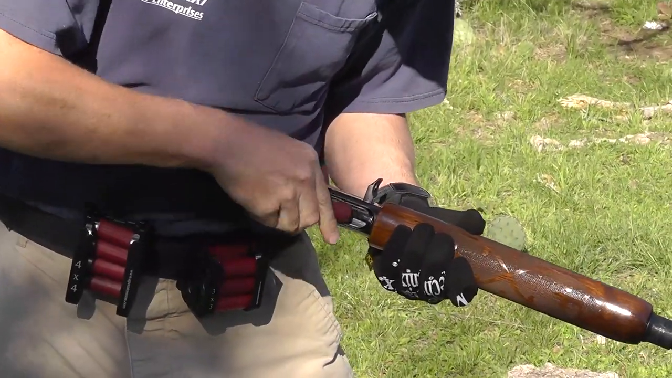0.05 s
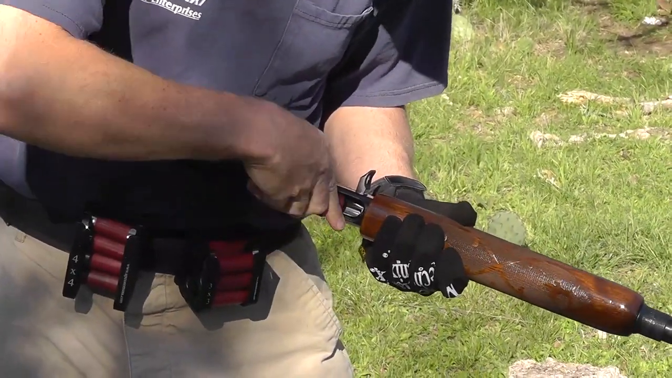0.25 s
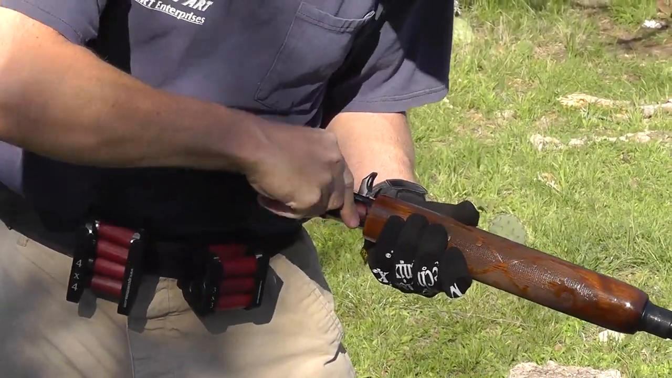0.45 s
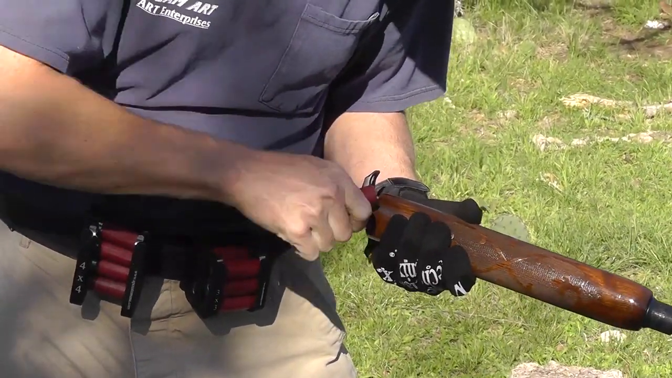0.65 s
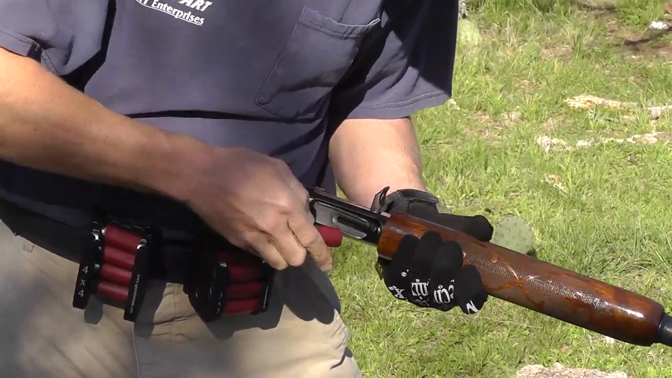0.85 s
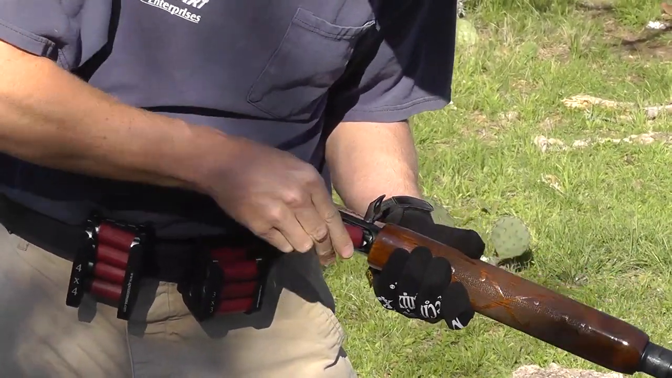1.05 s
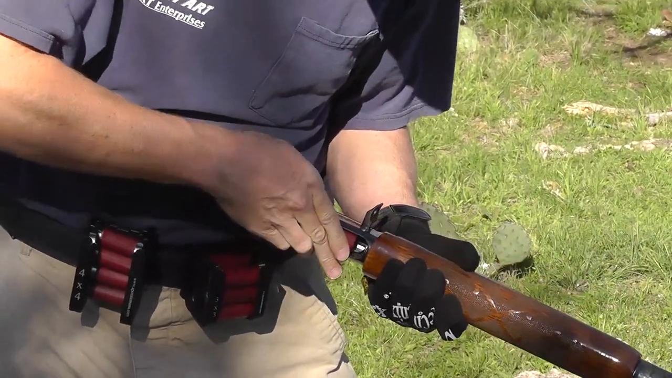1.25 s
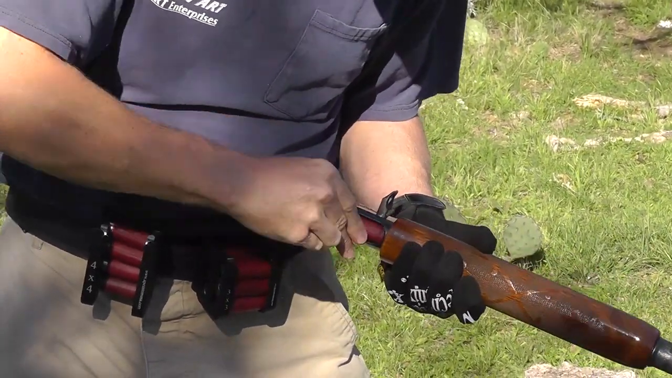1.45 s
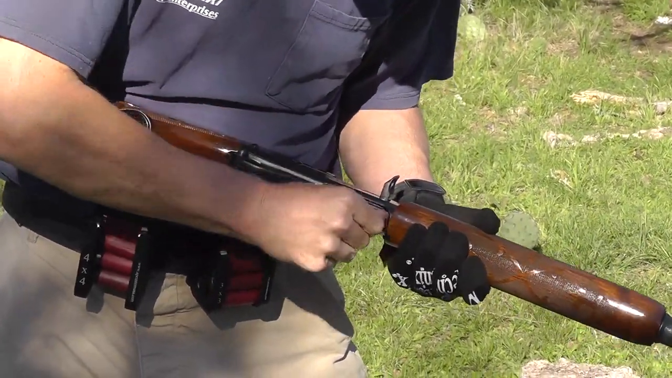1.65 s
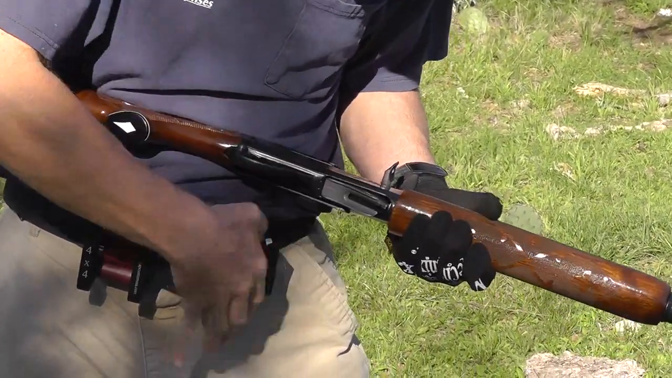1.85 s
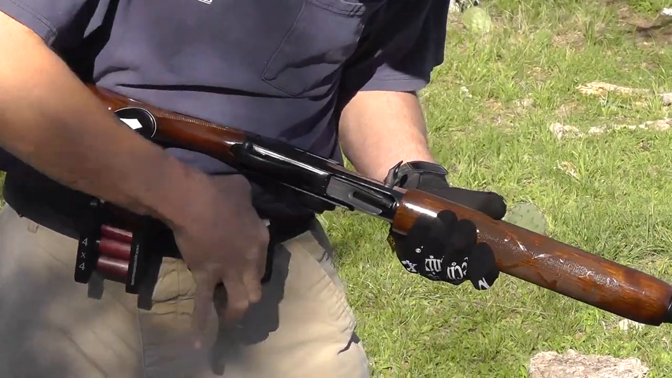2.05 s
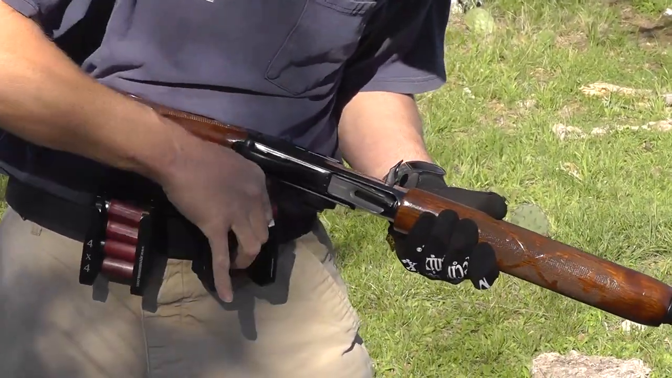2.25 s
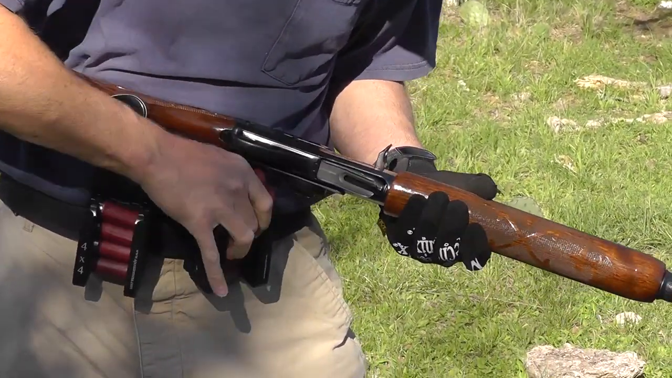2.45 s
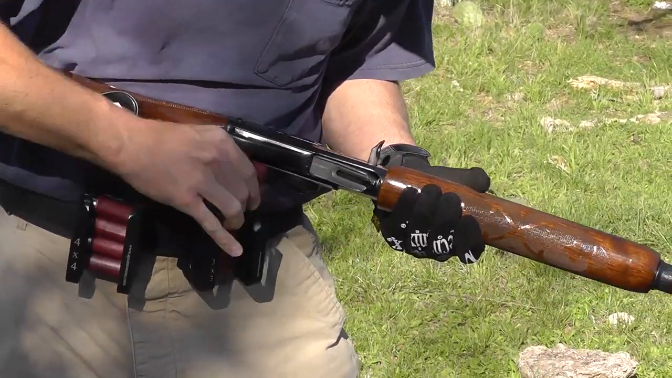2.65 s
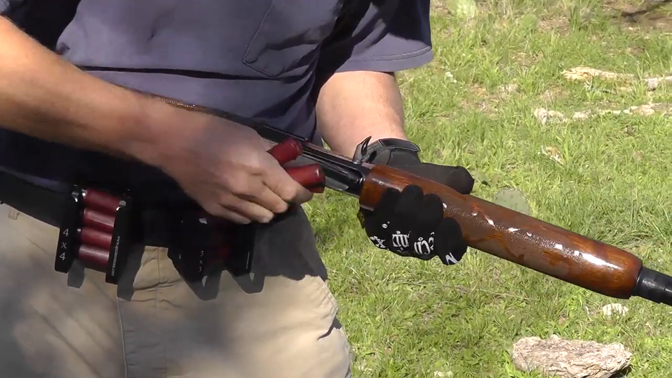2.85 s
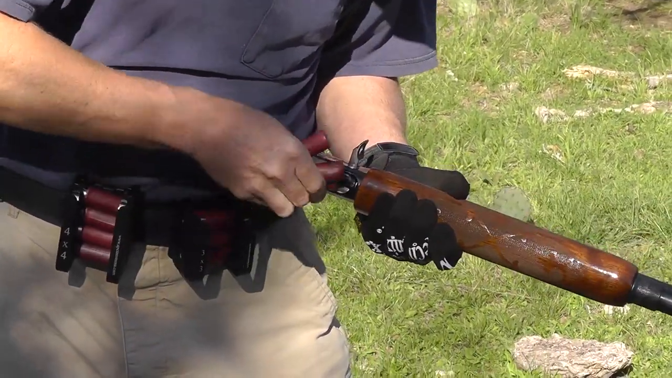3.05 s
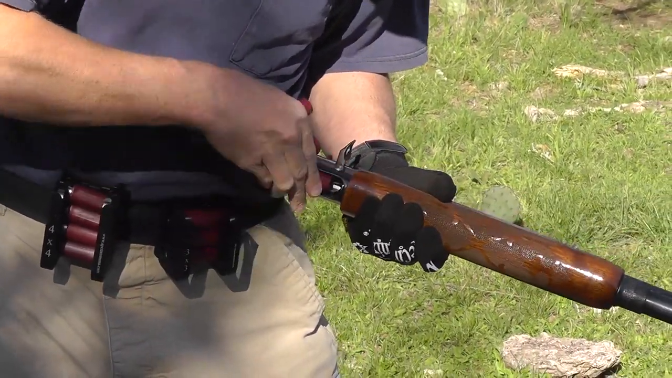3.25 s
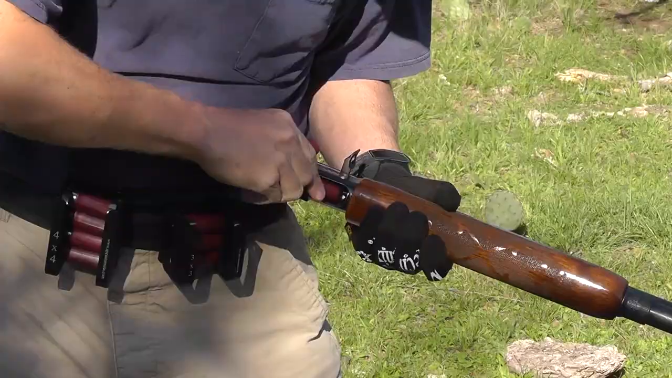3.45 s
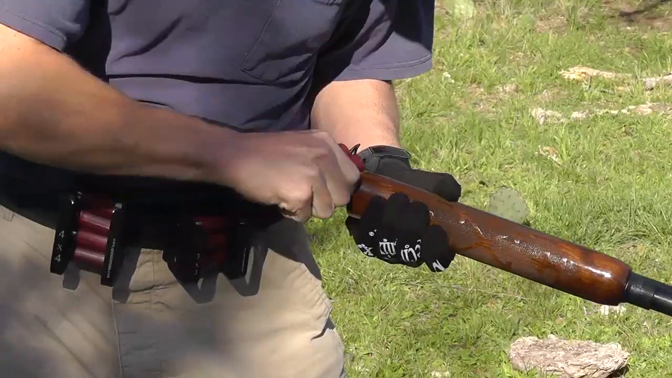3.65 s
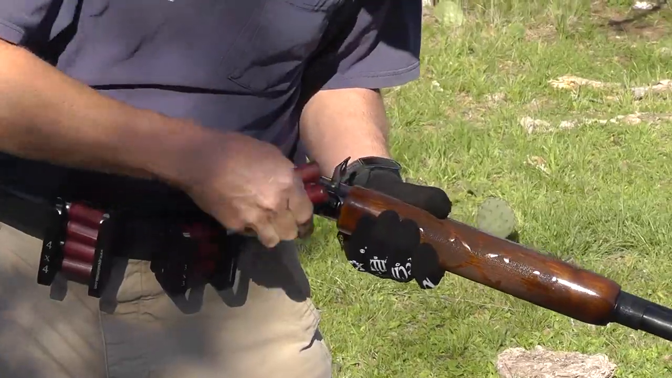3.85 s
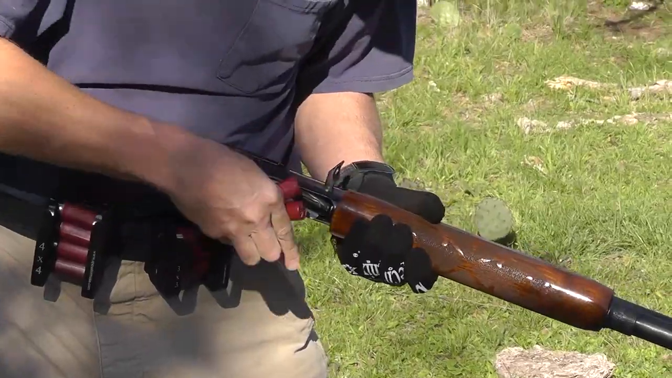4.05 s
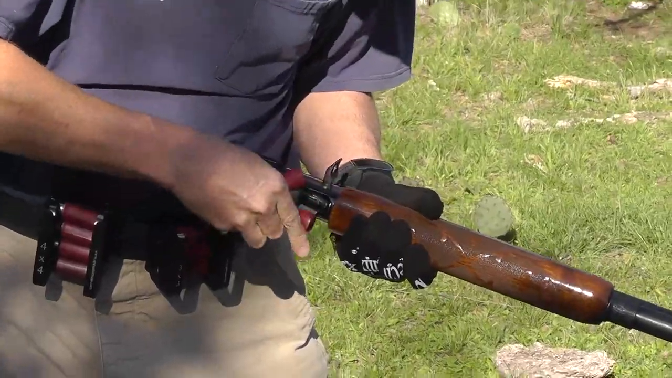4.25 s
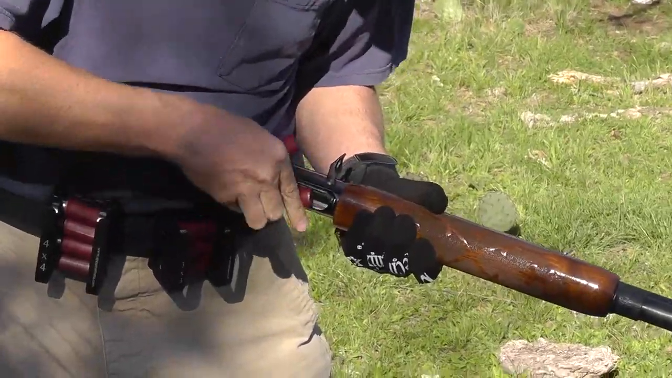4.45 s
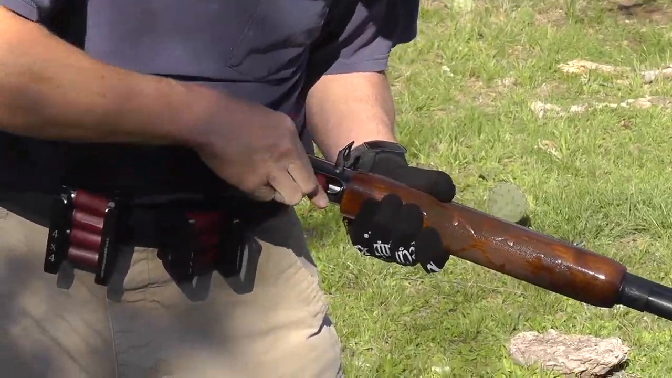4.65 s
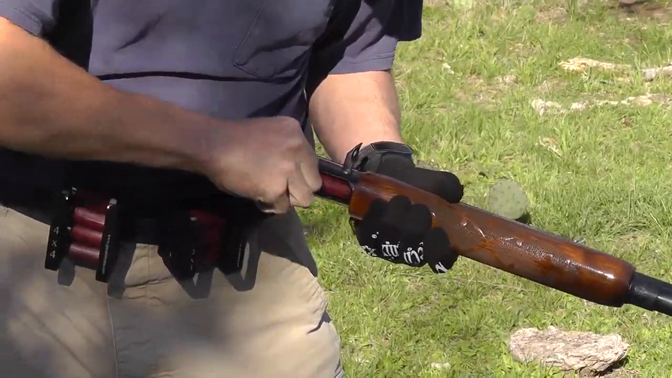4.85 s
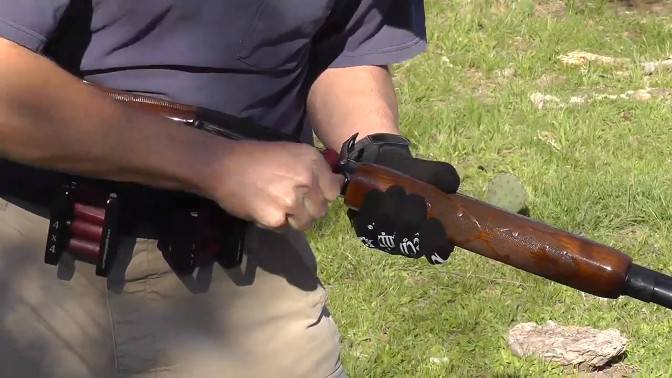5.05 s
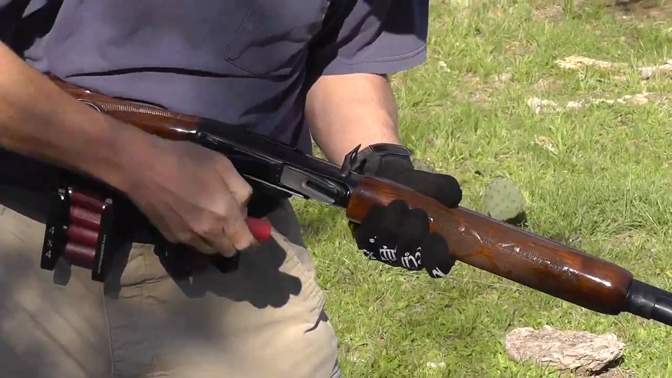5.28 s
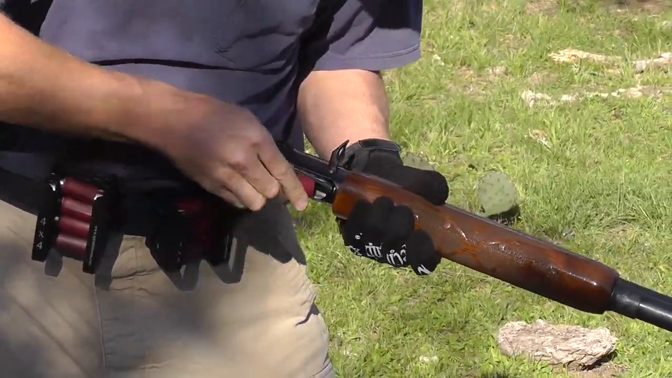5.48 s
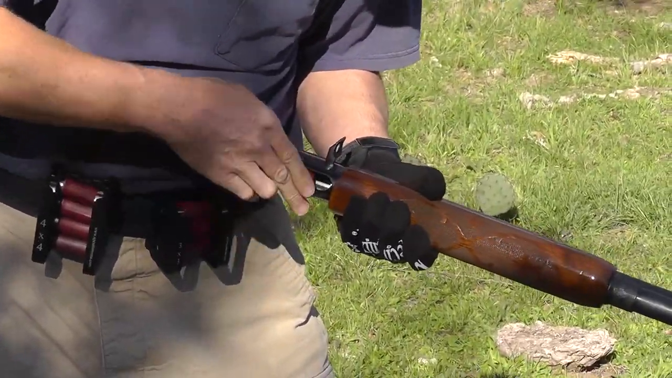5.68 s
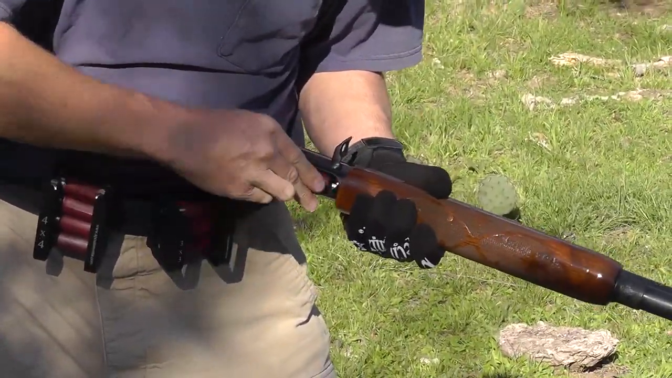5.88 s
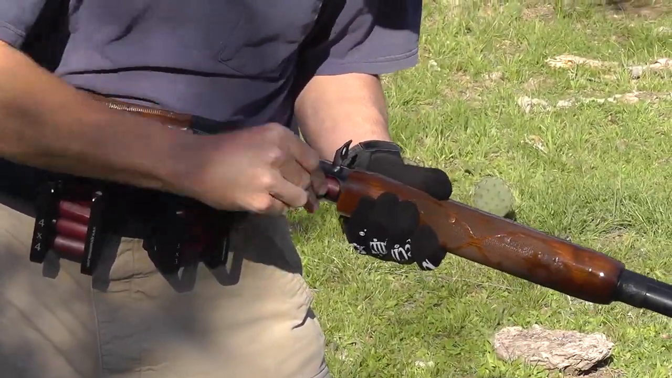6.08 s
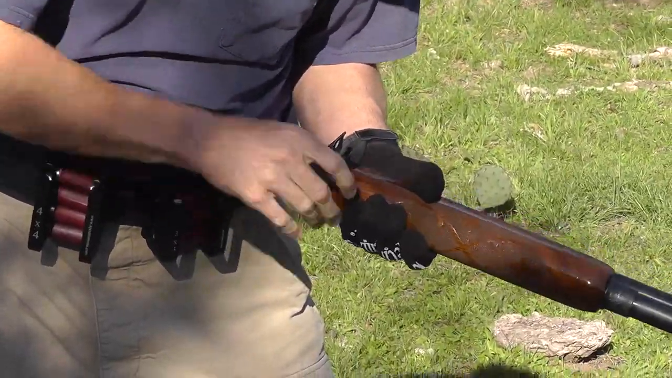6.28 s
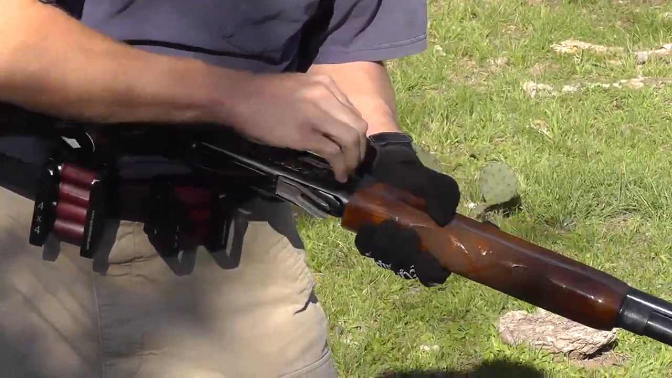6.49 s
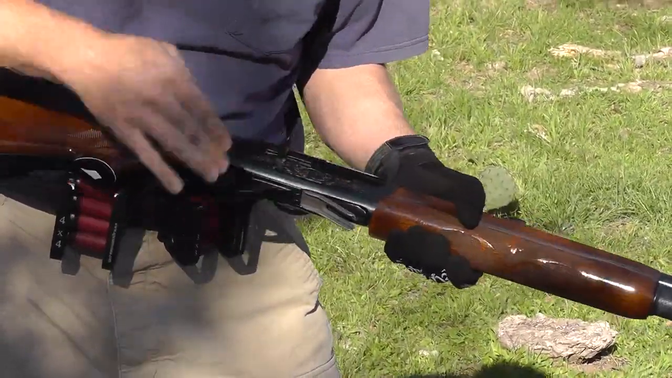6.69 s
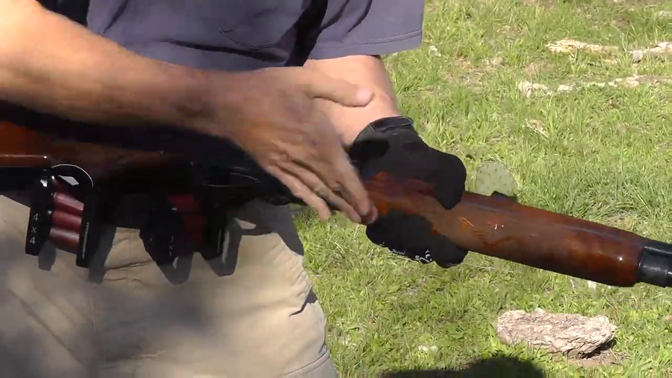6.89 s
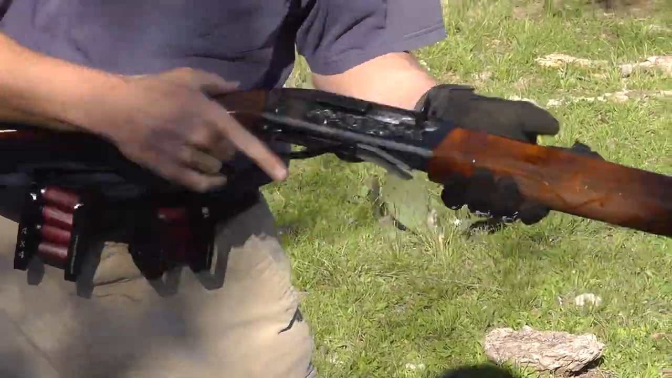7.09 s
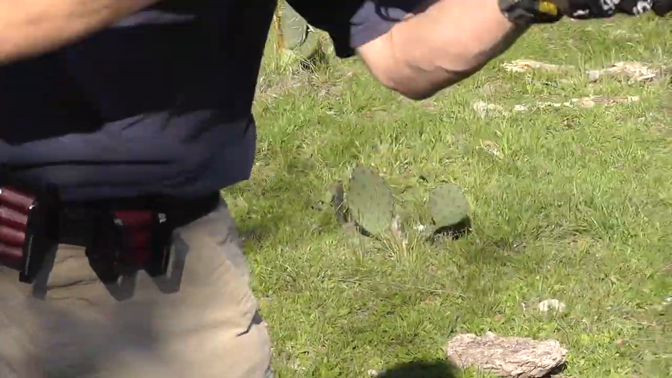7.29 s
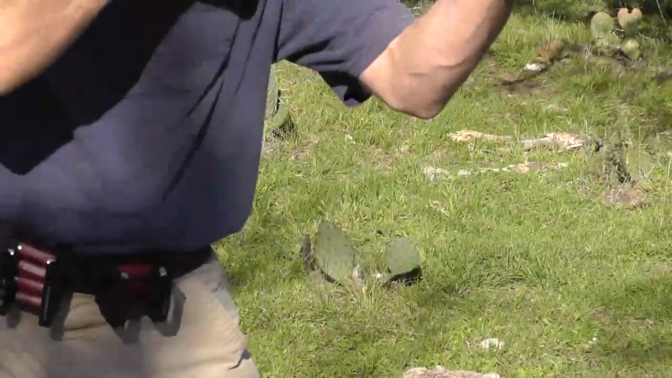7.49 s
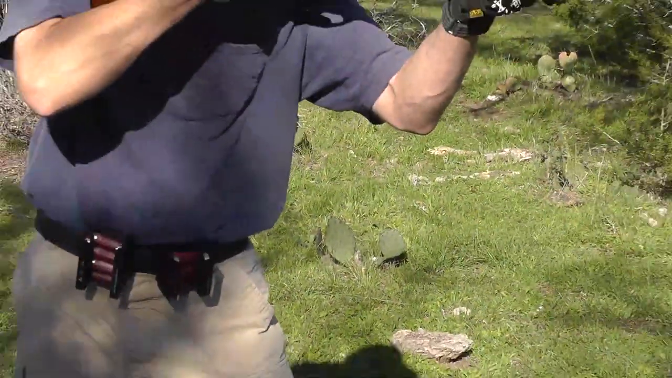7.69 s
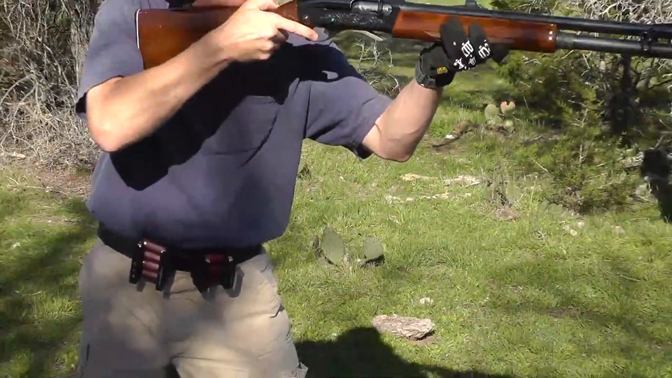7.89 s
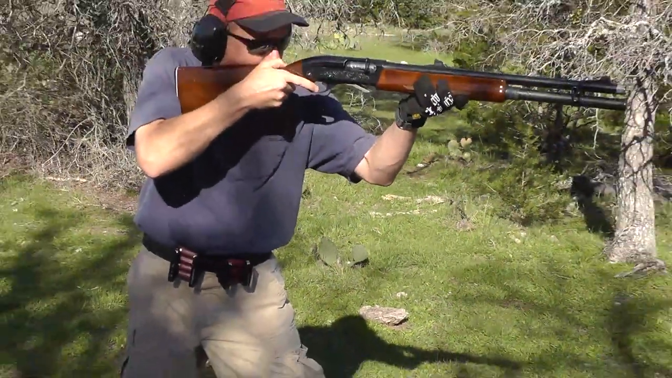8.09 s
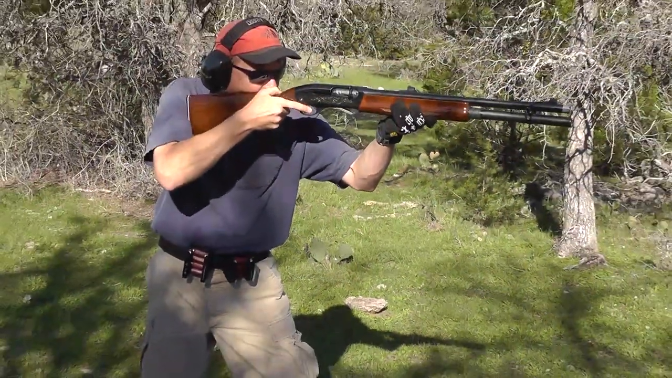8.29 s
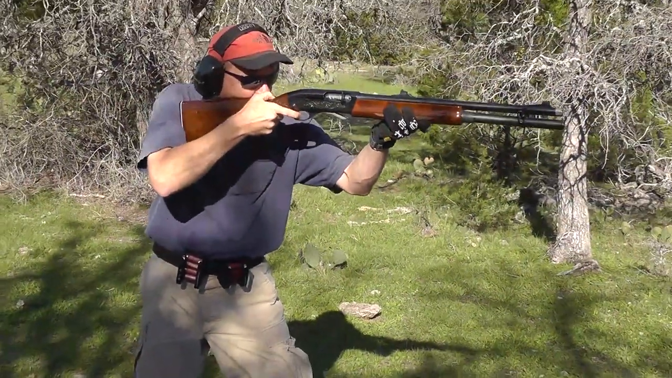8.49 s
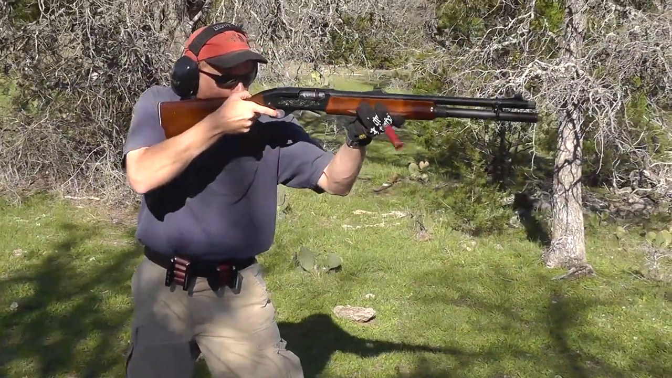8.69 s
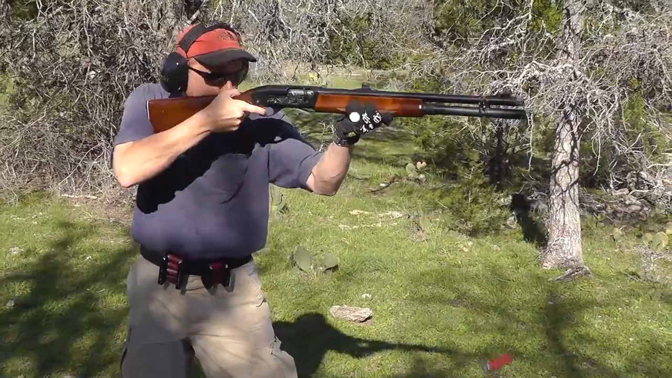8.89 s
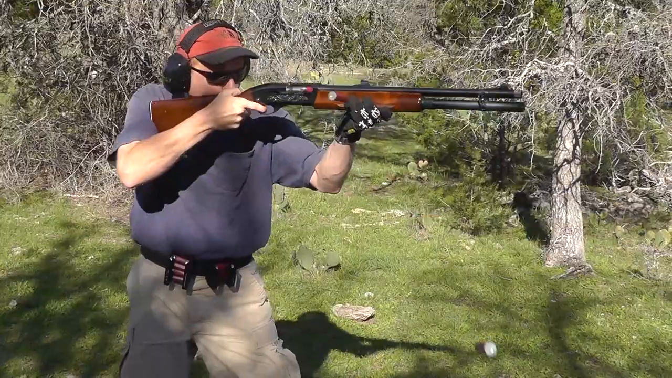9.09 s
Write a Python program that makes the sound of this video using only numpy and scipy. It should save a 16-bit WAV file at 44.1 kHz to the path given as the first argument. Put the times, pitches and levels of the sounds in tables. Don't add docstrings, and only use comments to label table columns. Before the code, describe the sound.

Shells click and pop into a shotgun in gusty wind, the bolt slams, then three fast gunshots crack and roar off the trees.

```python
import sys
import numpy as np
from scipy import signal
from scipy.fft import rfft, irfft, next_fast_len
from scipy.io import wavfile
from scipy.ndimage import uniform_filter1d

SR = 44100
rng = np.random.default_rng(int(sys.argv[2]) if len(sys.argv) > 2 else 0)


def level_to_linear(level):
    exponent = np.asarray(level, float) / 20
    return 10 ** exponent


def to_wav(sig):
    pcm = np.clip(np.atleast_2d(sig), -1, 1) * 32767
    pcm = np.round(pcm).astype(np.int16)
    wavfile.write(sys.argv[1], SR, pcm.T)


N = 402633
TIME = np.arange(N) / SR


def evened(x):
    return x / np.sqrt(np.mean(x ** 2) + 1e-20)


def topped(x, db):
    return level_to_linear(db) * x / np.sqrt(uniform_filter1d(x ** 2, 180).max() + 1e-20)


def add(mix, s, sound):
    part = mix[..., round(s * SR):][..., :sound.shape[-1]]
    part += sound[..., :part.shape[-1]]


def read(points, hz):
    f, value = np.transpose(points)
    return np.interp(np.log(hz + 1), np.log(f + 1), value)


def coloured(x, points):
    size = next_fast_len(x.shape[-1])
    gain = level_to_linear(read(points, np.fft.rfftfreq(size, 1 / SR)))
    return evened(irfft(rfft(x, size) * gain, size)[..., :x.shape[-1]])


def paired(x, same):
    size = next_fast_len(x.shape[-1])
    share = np.clip(read(same, np.fft.rfftfreq(size, 1 / SR)), -1, 1)
    left, other = rfft(x, size)
    right = share * left + np.sqrt(1 - share ** 2) * other
    return irfft(np.array([left, right]), size)[:, :x.shape[-1]]


def lumps(shape, width):
    width = max(int(width), 1)
    smooth = uniform_filter1d(rng.standard_normal(shape), width)
    smooth = evened(uniform_filter1d(smooth, width))
    return 2 * np.tanh(smooth / 2)


def resonate(x, hz, width):
    return signal.lfilter(*signal.iirpeak(hz, hz / width, SR), x)


def rattle(t60, rise, lump_db, size=4000):
    t = np.arange(size) / SR
    fall_db = -60 * (t / max(t60, .004)) ** 1.64
    swell = 1 - np.exp(-(t / rise) ** 2)
    return rng.standard_normal(size) * level_to_linear(lump_db * lumps(size, 29) + fall_db) * swell


def split(x, hz):
    return [signal.sosfilt(signal.butter(4, hz, kind, fs=SR, output="sos"), x) for kind in ("low", "high")]


# (strongest time [s], level [dB], time to fall 20 dB [s])
GUSTS = [(0.02, -32.5, 0.56), (0.204, -26.5, 0.13), (0.397, -28.5, 0.3), (0.519, -26, -0.5),
         (0.842, -26.5, 0.4), (1.156, -27.5, 0.6), (1.317, -26, 0.14), (1.499, -31, 0.31),
         (1.721, -34, -0.27), (2.039, -39.5, 0.16), (2.14, -52, 1), (2.29, -36.5, 0.12),
         (2.447, -38.5, 0.12), (2.59, -51.5, 0.3), (3.07, -46, 0.26), (3.26, -48, 0.4), (3.62, -47, 0.33),
         (4.546, -36, 0.01), (4.75, -42, 0.16), (5.268, -33, 0.11), (5.375, -37, 0.08), (6.28, -38, 0.12)]


def breeze_db():
    t = TIME[::64]
    calm_db, calm_db_per_s = -57, -1.5
    power = level_to_linear(2 * (calm_db + calm_db_per_s * t))
    for s, db, fall in GUSTS:
        away = np.where(t < s, (s - t) / 0.72, t - s) / max(fall, .02)
        power = power + level_to_linear(2 * (db - 20 * np.minimum(away, 6)))
    return np.interp(TIME, t, 10 * np.log10(power))


# (frequency [Hz], level [dB per Hz])
GUST_COLOUR = [(12, -56.5), (20, -25.5), (92, 2), (156, 0.5), (286, -10), (576, -29), (755, -32),
               (900, -33.5), (1170, -73.5), (1980, -120)]


def wind():
    level_db = breeze_db()
    puffs = rng.standard_normal((2, N)) * level_to_linear(4.5 * lumps(N, 700) + 2 * lumps((2, N), 600))
    low = coloured(paired(puffs, [(50, 0.8), (400, 0.27)]), GUST_COLOUR)
    low = low / np.sqrt(uniform_filter1d(low.mean(0) ** 2, 3000) + .05)
    flutter = evened(resonate(low, 470, 350)) * level_to_linear(3.13 * (level_db + 31.5) - 14.5)
    return (low + flutter) * level_to_linear(level_db + 3.5)


# (frequency [Hz], level [dB per Hz])
AIR_COLOUR = [(12, -33.5), (30, -21), (130, -3.5), (328, -9.5), (558, -9.5), (759, -11), (976, -16),
              (1370, -18), (1810, -22.5), (2020, -22), (2990, -28.5), (3250, -29.5), (16000, -34.5)]
# (frequency [Hz], likeness [0 to 1])
AIR_SAME = [(100, 0.31), (700, 0.45), (1500, 0.54), (3500, 0.9), (15000, 0.82)]


def air():
    noise = paired(rng.standard_normal((2, N)), AIR_SAME)
    return coloured(noise, AIR_COLOUR) * level_to_linear(-50 + 1.3 * lumps(N, 6000))


def ducking(x):
    power_db = 10 * np.log10(abs(uniform_filter1d((x ** 2).mean(0), 400)) + 1e-12)
    back = TIME * 30
    over_db = np.maximum(np.maximum.accumulate(power_db + back) - back + 16.0, 0)
    return level_to_linear(-.7 * uniform_filter1d(over_db, 400))


def receiver(x, shift=1):
    return (resonate(x, 1660, 150) + 6.2 * resonate(x, 1986 * shift, 240)
            + 0.81 * resonate(x, 2600 / shift, 150) + 0.6 * resonate(x, 1350 / shift, 210))


def plastic(x, shift=1):
    return resonate(x, 2200 * shift, 400) + 0.5 * resonate(x, 2710, 250) + 0.85 * resonate(x, 4950, 220)


def rings(x, lo_hz, hi_hz, t60, count):
    hz = lo_hz * (hi_hz / lo_hz) ** rng.random(count)
    return sum(resonate(x, f, 2.2 / t60) for f in hz)


# (frequency [Hz], level [dB per Hz])
STEEL = [(1880, -41), (3200, -29), (3440, -7.5), (4110, -1.5), (5760, -9), (6840, 1.5), (8790, -7),
         (9450, -6.5), (11400, -3.5), (13700, -9.5), (15500, -6)]


def contact(bolt_db, box_db, tube_db, edge_db, t60, box):
    rise = 0.055 * t60
    hit = rattle(t60, rise, 6.85, size=3000)
    hit = hit + rattle(t60 / 4, rise, 0, size=3000)
    spot = [(hz, level + rng.normal(0, 2)) for hz, level in STEEL]
    steel = coloured(hit, spot)
    steel = steel + .6 * evened(rings(steel, 3800, 8000, .014, count=4))
    body, edge = split(steel, 8500)
    tube, bolt = split(body, 5300)
    if box is plastic:
        tube = evened(tube) + 1.3 * evened(resonate(steel, 4850, 450))
    stock = resonate(hit, rng.uniform(500, 1400), 250)
    hollow = box(hit, rng.uniform(.93, 1.062))
    sound = topped(bolt, bolt_db - 5) + topped(tube, tube_db + 1) + topped(edge, edge_db + 5)
    sound = sound + topped(hollow, box_db + 3.5) + topped(stock, box_db - 13.5)
    lean_db = rng.normal(0, 0.24)
    return 0.95 * rise, sound * level_to_linear(lean_db * np.array([[1], [-1]]))


AT_BELT_S = (2, 3)
# (time [s], bolt steel peak [dB], receiver [dB], magazine tube [dB],
# edge above 8.5 kHz [dB]) # steel and brass contacts of the first and the second handful of shells
SHELLS = [(0.0862, -37, -39.5, -40, -39.5), (0.149, -27.5, -32.5, -31, -32.5),
          (0.2305, -34.5, -36.5, -39, -46), (0.3479, -25, -27.5, -27.5, -36),
          (0.5084, -31, -40, -40, -48), (0.5742, -39, -30, -26, -39), (0.6473, -15, -22, -34, -26),
          (1.1217, -34.5, -43.5, -50, -42.5), (1.26, -11, -26, -26.5, -20.5),
          (1.4422, -43, -32.5, -36.5, -47), (1.5246, -32, -34.5, -36, -40),
          (1.6579, -22, -32.5, -23, -19), (1.6721, -14.5, -23.5, -25, -22),
          (1.8396, -28.5, -28.5, -33.5, -33),
          (3.0408, -34, -39.5, -47, -46), (3.1126, -56, -32.5, -26, -44),
                 (3.303, -36, -38, -38, -47), (3.319, -30, -39, -37.5, -44), (3.571, -38, -38, -35.5, -47),
                 (3.694, -26.5, -39, -30.5, -22), (3.7025, -23, -39, -31, -28),
                 (3.7806, -19.5, -23, -26.5, -32), (4.493, -35.5, -39, -41, -56.5),
                 (4.7161, -40, -31, -54, -56), (4.821, -35, -37, -32.5, -52),
                 (4.854, -19.5, -28, -28.5, -37), (4.9712, -23, -35.5, -41, -39.5),
                 (5.007, -26, -24, -41, -40.5), (5.0428, -16, -38, -28.5, -21.5),
                 (5.064, -16.5, -32, -17.5, -17), (5.0744, -16, -22, -19.5, -21.5),
                 (5.155, -24, -28.5, -52, -38), (5.537, -42, -41, -50, -48), (5.683, -31, -45, -43, -42),
                 (5.715, -23, -29, -28.5, -44), (5.967, -42, -41, -45, -55),
                 (5.9899, -13, -25.5, -26.5, -25.5), (6.144, -29, -56, -37, -55),
                 (6.1623, -24, -36, -22.5, -42), (6.2181, -12, -30, -41, -38),
                 (6.229, -13.5, -32, -36, -28), (6.3812, -19.5, -29.5, -37.5, -37.5),
                 (6.4027, -32, -24, -46, -51.5), (6.516, -36, -37, -37.5, -50)]
# (time [s], bolt steel peak [dB], holder [dB], clip [dB], edge [dB])
HOLDER = [(2.1951, -29, -34, -31, -34.5), (2.2108, -13, -27.5, -29, -31), (2.2417, -15.5, -29, -32, -42),
          (2.2671, -28, -37.5, -29.5, -46), (2.359, -5.5, -21, -22, -25), (2.564, -36.5, -33.5, -30, -47),
          (2.7116, -16, -30, -30, -27), (2.7214, -14, -32, -31, -32), (2.7424, -22, -43, -28, -39.5),
          (2.7554, -39, -43, -38, -55), (2.7674, -41, -45, -35, -47), (2.7824, -34, -42.5, -37, -49)]
ACTION = [(6.6045, -32, -35, -34, -31), (6.6255, -18.5, -23.5, -22, -25), (6.6334, -9, -20.5, -18.5, -13.5),
          (6.6495, -10, -26.5, -23, -18.5), (6.6891, -5, -21, -21, -12),
          (6.724, -11.5, -33.5, -20.5, -24.5), (6.7484, -12.5, -28.5, -30, -23),
          (6.7694, -21, -41.5, -36, -35.5), (6.9371, -17.5, -24.5, -26, -23.5),
          (6.9445, -14, -22, -22, -24), (6.953, -10, -25.5, -23, -20.5), (6.997, -5, -16, -22, -16),
          (7.326, -33.5, -44.5, -49, -51), (7.5585, -38, -43.5, -44, -60), (7.5803, -36.5, -47, -48, -54),
          (8.312, -46, -44, -41, -43)]
TOUCHES = [(0.0537, -37, -37, -53, -46), (0.1983, -47, -54, -49, -53), (0.458, -48, -42, -41, -53),
           (0.4712, -42, -38.5, -37, -47), (0.5508, -25, -36, -28.5, -29),
           (0.708, -33, -45, -45, -58), (0.7474, -57, -40, -60, -51), (0.763, -50, -40.5, -41, -44.5),
           (1.0416, -39, -48.5, -49, -44), (2.315, -50, -49, -46, -57.5),
           (1.5413, -25.5, -31, -37, -43), (1.5653, -39.5, -52, -43, -56),
           (1.5963, -31, -42, -31, -42.5), (1.7993, -33, -43, -41, -52),
           (2.123, -34, -36, -40, -43.5), (2.16, -42, -41, -41, -50), (2.4093, -37, -41, -32.5, -49),
           (2.4288, -52, -47, -43, -60.5), (2.4863, -58, -47, -39.5, -52),
           (2.5047, -51, -47, -40, -51), (2.531, -69, -42, -43, -49), (2.058, -66, -53, -60, -68),
           (2.655, -46, -61, -62, -69), (2.8238, -60, -52, -47, -65), (2.902, -68, -64, -51, -68),
           (2.932, -60, -54, -50, -65),
           (3.0937, -45.5, -45, -48, -46), (3.1499, -45, -41.5, -46, -49),
                (3.1935, -63, -42, -38.5, -65), (3.4146, -48, -50, -49, -69),
                (3.5914, -29, -36.5, -39, -40.5), (3.6274, -45, -51.5, -49, -54),
                (3.6436, -49, -39.5, -52, -56), (3.6696, -42, -44, -28, -41),
                (3.7471, -35, -34, -49, -36.5), (3.8347, -34.5, -43, -49, -57),
                (3.8954, -46, -45.5, -47, -50), (3.919, -53, -53.5, -45.5, -70),
                (3.9978, -66, -71, -54, -72), (4.0068, -53, -70.5, -54, -72),
                (4.4293, -61, -43.5, -56, -56), (4.6495, -55, -40.5, -55, -59),
                (4.6703, -41, -48, -48, -49.5), (4.6964, -39, -36.5, -52, -64), (4.796, -53, -41, -48, -55),
                (4.91, -39, -45.5, -51, -57), (5.1898, -40, -39, -45.5, -42),
                (5.6102, -52, -52, -49, -47.5), (5.8903, -47, -56.5, -59, -69.5),
                (6.008, -36, -36, -36, -47), (6.1167, -45, -54, -56, -55), (6.135, -37, -43, -52, -43),
           (.1367, -43, -44, -48, -48), (1.254, -17.5, -29.5, -32, -35), (1.631, -34, -43, -46, -41),
         (3.7647, -28, -38, -37, -44), (4.808, -54, -48, -52, -62), (5.0, -28, -38, -37, -52),
         (6.204, -29, -43, -37, -42.5), (6.3706, -38, -58, -46, -52), (6.5826, -41, -42, -45, -55),
         (6.908, -60, -41.5, -63, -68), (6.921, -50, -56, -44, -59), (6.9881, -17, -25, -36, -30),
         (7.134, -56, -50, -62, -63), (7.3027, -50.5, -63, -65, -49), (7.316, -46, -58, -60, -52),
         (7.4994, -44.5, -57, -64, -60), (7.6004, -52, -53, -70, -51.5), (7.649, -51, -65, -73, -47),
         (7.6821, -53, -63, -69.5, -53.5), (8.299, -52, -60, -52.5, -58),
         (8.4481, -51.5, -55.5, -56.5, -58), (8.579, -52.5, -68, -65, -55.5)]


def clicks():
    out = np.zeros((2, N))
    kinds = [(SHELLS, .028), (HOLDER, 0.037), (ACTION, 0.032),
             (TOUCHES, 0.021)]
    for rows, t60 in kinds:
        for s, *levels in rows:
            box = plastic if AT_BELT_S[0] < s < AT_BELT_S[1] else receiver
            early, sound = contact(*levels, t60, box)
            add(out, s - early, sound)
    return out


# (start [s], strongest [s], end [s], level [dB], receiver against level [dB])
SLIDES = [(.495, .545, .57, -47, 0), (0.558, 0.59, 0.69, -30, -2), (0.658, 0.65, 0.92, -50.5, -4.5),
          (0.995, 1.08, 1.63, -59.5, -2.5), (1.517, 1.53, 1.71, -41, -2), (1.564, 1.594, 1.88, -45.5, -3),
          (1.625, 1.73, 1.687, -24.5, -7.5), (2.05, 2.19, 2.7, -52.5, 0), (2.198, 2.4, 2.223, -27, -2.5),
          (2.69, 2.735, 2.79, -35, 1), (2.757, 2.79, 2.93, -57, 10), (2.915, 2.74, 2.965, -56, 4.5),
          (3.1, 3.14, 3.3, -51, 2), (3.554, 3.5, 3.77, -45.5, -2), (3.658, 3.82, 3.74, -36, -6),
          (3.723, 4.2, 3.75, -37.5, -4), (3.79, 4.16, 3.95, -56.5, 6), (4.632, 4.9, 4.58, -47, 4),
          (4.773, 4.846, 5.05, -54, 3), (4.944, 5.1, 5.045, -34.5, 0), (5.059, 4.91, 5.13, -26, -1),
          (5.103, 5.16, 5.26, -48.5, 4), (5.147, 5.15, 5.19, -36, 5), (5.948, 6.1, 6.03, -49.5, 4.5),
          (6.108, 6.13, 6.32, -34, -2.5), (6.209, 6.5, 6.24, -25.5, -5), (6.364, 6.22, 6.42, -41, 1.5),
          (6.62, 6.43, 6.85, -30, -5), (6.7, 6.6, 6.78, -30, -1.5), (6.78, 6.9, 7, -54.5, -4),
          (6.922, 6.972, 6.99, -25.5, 0.5), (7.002, 7.07, 7.3, -54, 0), (7.517, 7.9, 7.9, -65, 0)]


def scrape():
    grit = rng.standard_normal(N) * level_to_linear(2.8 * lumps(N, 260) + 4 * lumps(N, 30))
    body, edge = (evened(part) for part in split(coloured(grit, STEEL), 8500))
    at_belt = (TIME > AT_BELT_S[0]) & (TIME < AT_BELT_S[1])
    steel_box = evened(sum(level_to_linear(4.5 * lumps(N, 700)) * receiver(grit, shift) for shift in (.95, 1.06)))
    box = np.where(at_belt, 1.8 * evened(plastic(grit)), 1.24 * steel_box)
    box = box + 0.26 * evened(resonate(grit, 550, 600))
    out = np.zeros(N)
    for start, top, end, db, box_db in SLIDES:
        edge_db = np.clip(0.99 * (db + 30), -18, 4)
        part = slice(round(start * SR), round(end * SR))
        ramp = np.interp(TIME[part], [start, np.clip(top, start, end), end], [0, 1, 0])
        stroke = np.sin(np.pi / 2 * ramp) ** 1.95
        out[part] += level_to_linear(db) * stroke * (body[part] + level_to_linear(box_db) * box[part] + level_to_linear(edge_db) * edge[part])
    return out


def spring():
    out = np.zeros((2, N))
    t = TIME[:SR]
    level_db = -55 - 60 * t / .8 + 4.5 * lumps(SR, 500)
    add(out, .603, level_to_linear(level_db) * np.sin(2 * np.pi * 10550 * t)[None])
    return out


def thumps(rows, width, t60):
    out = np.zeros(N)
    for s, db, hz in rows:
        push = rattle(t60, 0.004, 0.99, size=4000 + round(t60 * SR))
        ring = resonate(resonate(push, hz, width), hz, 3 * width)
        add(out, s - .002, topped(ring, db))
    return out


# (time [s], peak [dB], pitch [Hz])
POPS = [
    (0.651, -13, 1654),
    (1.6741, -18.5, 1675),
    (3.7834, -14.5, 1688),
    (5.0614, -20, 1768),
    (6.2277, -12, 1680),
]


def pops():
    return thumps(POPS, 117, 0.024)


# (time [s], peak [dB], pitch [Hz])
KNOCKS = [(1.66, -34, 500), (2.722, -32.5, 480), (3.783, -33, 505), (6.23, -28, 460), (6.634, -28, 1340),
          (6.691, -18, 1400), (6.908, -42, 1450), (6.947, -25, 1348), (6.995, -21.5, 943),
          (7.436, -39.5, 750), (7.561, -37, 690.5), (8.312, -44.5, 1250)]


def knocks():
    return thumps(KNOCKS, 250, 0.035)


# (time [s], peak [dB], pitch [Hz])
HOLDER_RING = [
    (2.732, -41.5, 700),
]


def holder_hum():
    return thumps(HOLDER_RING, 45.3, 0.25)


# (time [s], peak [dB], pitch [Hz])
STOCK_RUB = [
    (3.5, -44.5, 340),
]


def stock_rub():
    return thumps(STOCK_RUB, 150, 1.0)


# (time [s], peak [dB], pitch [Hz])
JOLTS = [
    (6.629, -21, 110),
    (6.687, -17, 110),
    (6.948, -21.5, 110),
    (6.993, -17.5, 110),
]


def jolts():
    return np.array([thumps(JOLTS, 550, 0.045), thumps(JOLTS, 450, 0.045)])


# (time [s], peak [dB], pitch [Hz])
TUBE_RING = [
    (7.04, -47, 1662),
]


def tube_ring():
    return thumps(TUBE_RING, 120, 0.69)


def yard(x):
    t, out = np.arange(SR // 3) / SR, 0
    for k in range(3):
        tail = rng.standard_normal((2, len(t))) * level_to_linear(-60 * t / 0.25) * (t > .006)
        tail = paired(tail, [(700, .4), (1500, 0.66), (15000, 0.93)])
        turn = np.cos(2 * np.pi * (40 * TIME + k / 3))
        out = out + signal.fftconvolve(x * turn, tail / np.linalg.norm(tail[0]), axes=1)[:, :N]
    return .07 * .85 * out


# (time [s], hum pitch [Hz], hum level [dB])
ZOOM = [
    (7.6, 153.1, -62.5),
    (7.763, 179.9, -52.5),
    (8.34, 180.3, -53.5),
]
# (frequency [Hz], width [Hz], level [dB])
WHINE = [(6950, 570, -66), (6200, 340, -73), (10430, 410, -70), (4150.4, 1190, -74)]
# (start [s], end [s], pitch [Hz], level [dB])
FAR_TONES = [
    (8.35, 26, 497, -57.5),
]


def running(start, end):
    return uniform_filter1d(1. * (TIME > start) * (TIME < end), 1500)


def zoom():
    s, hz, db = np.transpose(ZOOM)
    level_db = np.interp(TIME, s, db) + 5.0 + 2.5 * lumps(N, 500)
    hum = np.sin(2 * np.pi * np.cumsum(np.interp(TIME, s, hz)) / SR) * level_to_linear(level_db)
    noise = rng.standard_normal(N)
    hiss = sum(level_to_linear(d) * evened(resonate(noise, f, width)) for f, width, d in WHINE)
    out = running(s[0], s[-1]) * (hum + hiss)
    for start, end, f, d in FAR_TONES:
        tone = level_to_linear(d + 0.74 * lumps(N, 900)) * np.sin(2 * np.pi * f * TIME)
        out += running(start, end) * tone
    return out


# (time [s], peak [dB], t60 [s])
SHOTS = [
    (8.598, -4.5, 0.063),
    (8.842, -5, 0.05),
    (9.0848, -3.5, 0.045),
]


def shots():
    out = np.zeros((2, N))
    bright = [(1500, -22.5), (3000, 0.5), (6500, 8.0), (12000, 3.5), (16000, 2.5)]  # (Hz, dB per Hz)
    for s, db, t60 in SHOTS:
        crack, skew = (topped(coloured(rattle(t60, .0012, 3), bright), db) for _ in range(2))
        push = [topped(resonate(rattle(.045, .0015, 3), 650, 1100), db - 3) for _ in range(2)]
        thud = topped(resonate(rattle(0.063, 0.006, 0.61), 100, 100), db - 11.0)
        side = 0.33 * skew + push[0] + .8 * thud
        add(out, s - .001, crack + 1.03 * push[1] + thud + np.array([side, -side]))
    return out


# (time after the shot [s], level [dB], treble against level [dB])
ECHO = [
    (.02, -18, -8.5),
    (0.065, -23, -5.5),
    (0.084, -30, -2.5),
    (.101, -18.5, -11.5),
    (.116, -26, -8.5),
    (.135, -21.5, -5.5),
    (.155, -25.5, -10),
    (.19, -19.5, -13.5),
    (0.236, -21, -11),
]
# (frequency [Hz], level [dB per Hz])
ECHO_LOW = [(25, -31.5), (60, -24), (150, -3.5), (300, -2.5), (600, 2), (1100, -1.5), (1650, 0),
            (2200, -10), (4000, -31)]
# (frequency [Hz], level [dB per Hz])
ECHO_HIGH = [(1800, -17), (2600, 5.5), (4000, -1), (7000, -2.5), (11000, -12.5), (16000, -18.5)]
# (frequency [Hz], likeness [0 to 1])
ECHO_SAME = [(60, 0.31), (240, 0.21), (950, 0.14), (3770, 0.71), (15000, 0.62)]
# (frequency [Hz], left minus right [dB])
ECHO_SIDE = [(60, -1.5), (240, -2), (950, -5.5), (3770, -4), (15000, 3.5)]


def trunk_pulses(size):
    strength = level_to_linear(2.5 * np.minimum(rng.exponential(1, (2, size)), 5))
    present = rng.random((2, size)) < 6000 / SR
    return strength * present * rng.choice([1., -1.], (2, size), p=[.6, .4])


def echo():
    s, db, treble_db = np.transpose(ECHO)
    fired = np.transpose(SHOTS)[0] + s[0]
    t = TIME[round(fired[0] * SR) + 1:]
    count = len(t)
    since = t - fired[np.searchsorted(fired, t) - 1] + s[0]
    trunks = trunk_pulses(count)
    place = np.minimum(np.round((since - s[0]) * SR).astype(int), count - 1)
    trunks = 0.74 * trunks[:, place] + 0.65 * trunks
    trunks = trunks - trunks.mean()
    z = signal.stft(paired(trunks, ECHO_SAME), nperseg=512)[2]
    favour = evened(uniform_filter1d(lumps(z.shape[1:], 2), 3, 0))
    z = z * level_to_linear(2.2 * favour)
    low = coloured(signal.istft(z, nperseg=512)[1][:, :count], ECHO_LOW)
    low = low / np.sqrt(uniform_filter1d((low ** 2).mean(0), 1500) + .1)
    high = coloured(paired(rng.standard_normal((2, count)), ECHO_SAME), ECHO_HIGH)
    level = level_to_linear(np.interp(since, s, db) + 7.0 + 2 * lumps(count, 150))
    sound = level * (low + high * level_to_linear(np.interp(since, s, treble_db) + 0.5))
    size = next_fast_len(count)
    lean = level_to_linear(np.outer([.5, -.5], read(ECHO_SIDE, np.fft.rfftfreq(size, 1 / SR))))
    sound = irfft(rfft(sound, size) * lean, size)[:, :count]
    out = np.zeros((2, N))
    add(out, fired[0], sound * np.minimum((t - fired[0]) / 0.0012, 1))
    return out


# (time after the shot [s], peak [dB], pitch [Hz])
BIG_RETURNS = [
    (.1, -12, 395),
    (.188, -17, 199),
]


def big_returns():
    out = np.zeros((2, N))
    for s, _, _ in SHOTS:
        for after, db, hz in BIG_RETURNS:
            pulse = topped(resonate(rattle(0.027, 0.0018, 0.88), hz, 0.28 * hz), db)
            add(out, s + after, pulse * np.array([[.7], [1.1]]))
    return out


# (time [s], peak [dB], t60 [s])
BOLTS = [
    (8.725, -12.5, 0.049),
    (8.969, -11, 0.038),
]


def bolt_slams():
    out = np.zeros((2, N))
    for s, db, t60 in BOLTS:
        add(out, s - .002, topped(coloured(rattle(t60, 0.0053, 2.4), STEEL), db + 0.5)[None])
    return out


def scene():
    gun = clicks() + scrape() + spring() + pops() + knocks() + holder_hum() + stock_rub() + tube_ring()
    handling = gun + jolts() + yard(gun)
    weather = wind() + air() * ducking(gun)
    return weather + handling + zoom() + shots() + echo() + big_returns() + bolt_slams()


def low_pass(x):
    return signal.sosfilt(signal.butter(12, 16300, fs=SR, output="sos"), x)


NOTCH_HZ = [1550, 1795, 2370, 3090]
# (width [Hz], level [dB])
NOTCHES = [(120, -5), (130, -25), (100, -22), (260, -25)]


def record(dry):
    x = dry
    for hz, (width, db) in zip(NOTCH_HZ, NOTCHES):
        x = x - (1 - level_to_linear(db)) * resonate(x, hz, width)
    x = signal.oaconvolve(x, signal.firwin(127, 15670, fs=SR)[None], "same")
    mix = np.tanh(0.47 * x) / 0.96
    return low_pass(mix)


dry = scene()
out = record(dry)
to_wav(out)
```